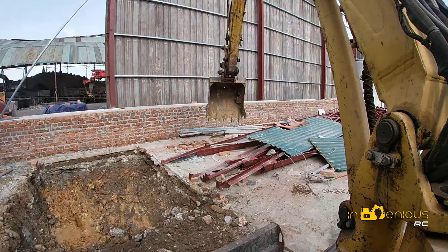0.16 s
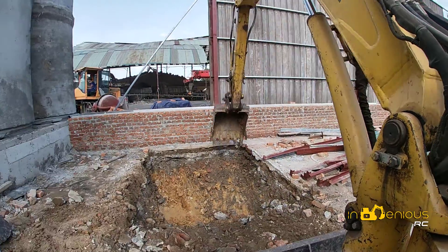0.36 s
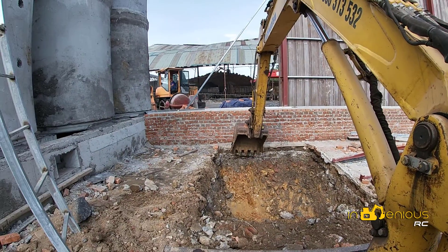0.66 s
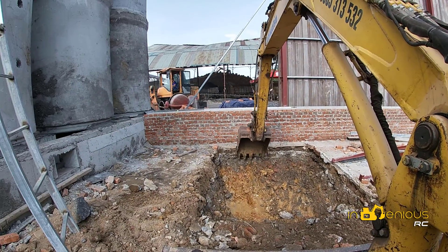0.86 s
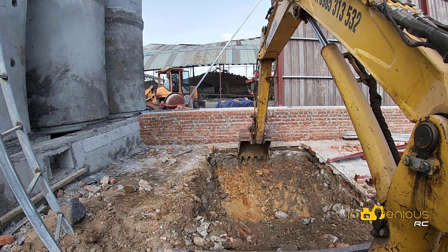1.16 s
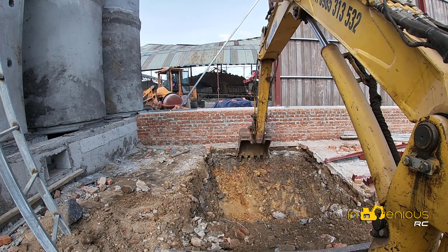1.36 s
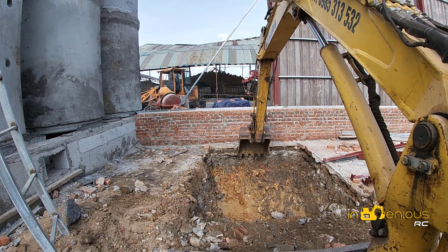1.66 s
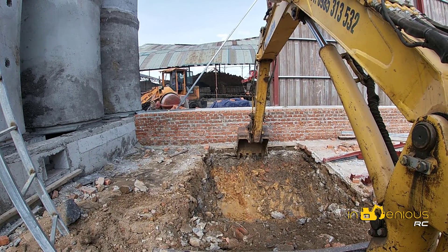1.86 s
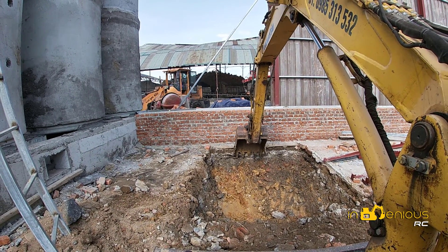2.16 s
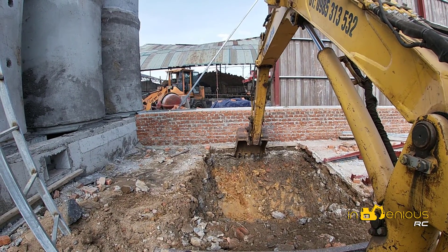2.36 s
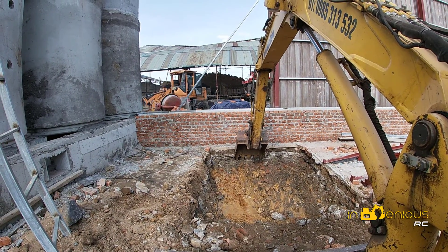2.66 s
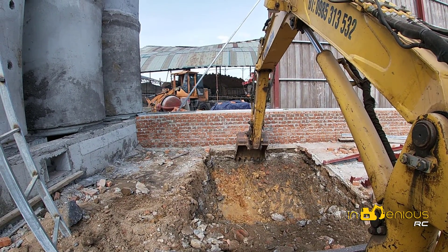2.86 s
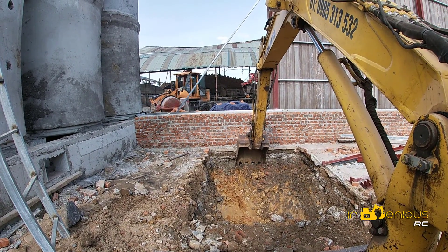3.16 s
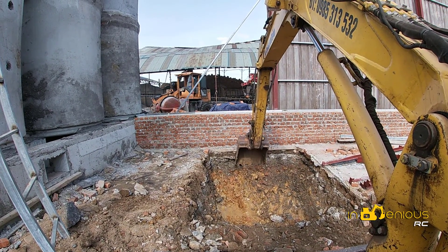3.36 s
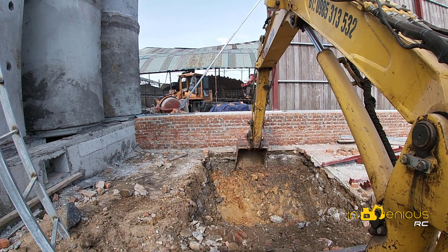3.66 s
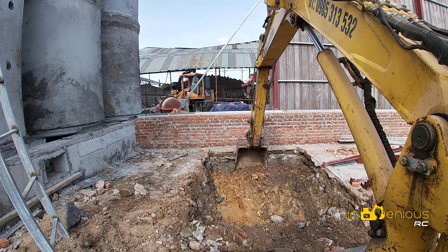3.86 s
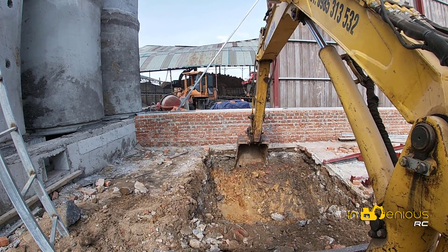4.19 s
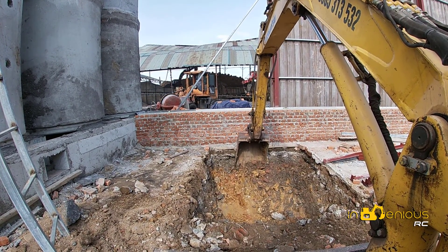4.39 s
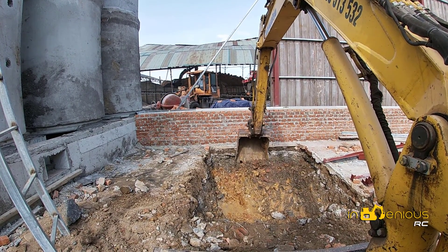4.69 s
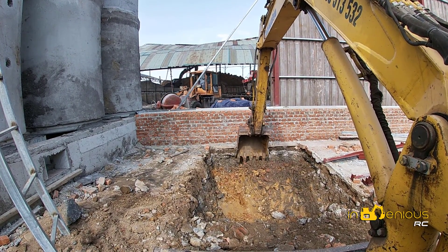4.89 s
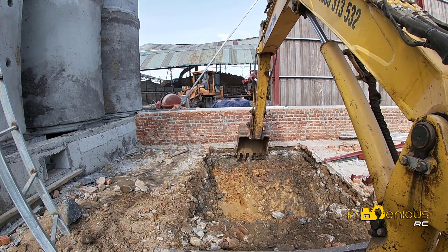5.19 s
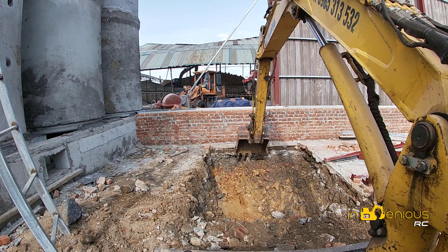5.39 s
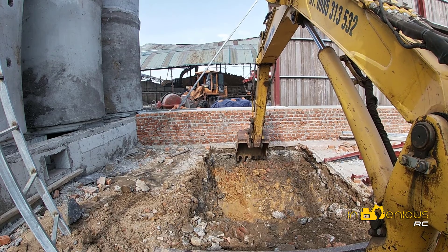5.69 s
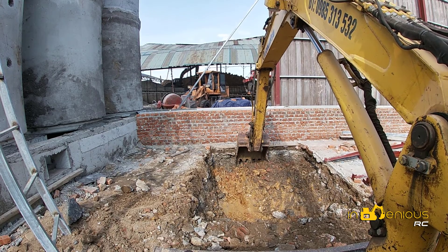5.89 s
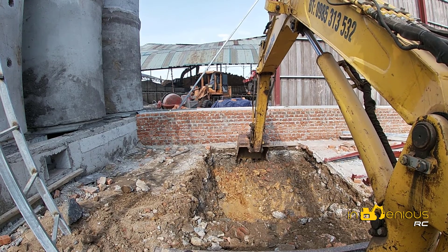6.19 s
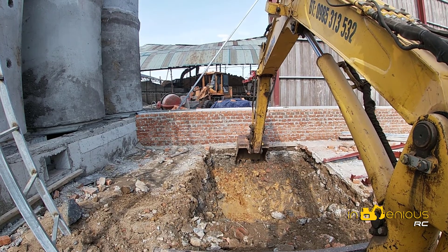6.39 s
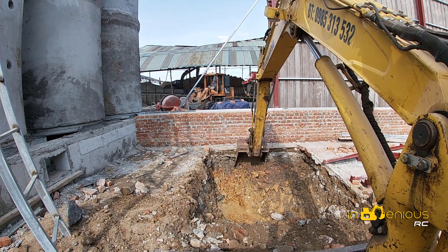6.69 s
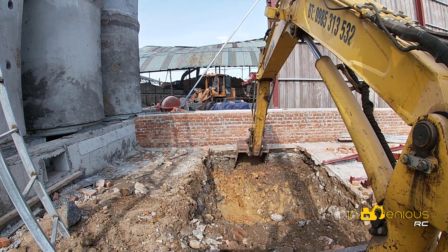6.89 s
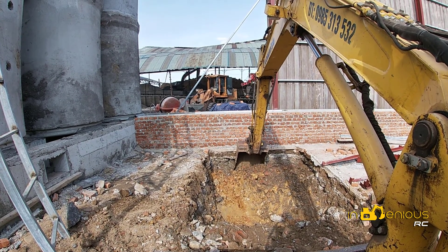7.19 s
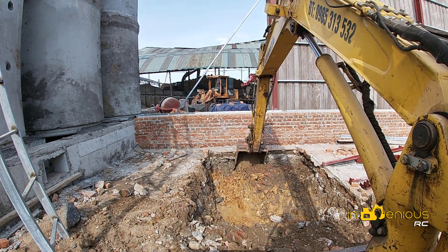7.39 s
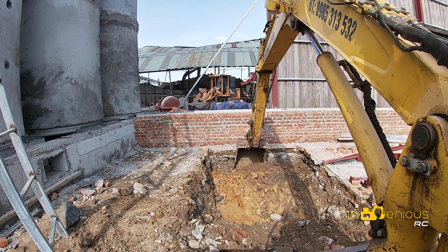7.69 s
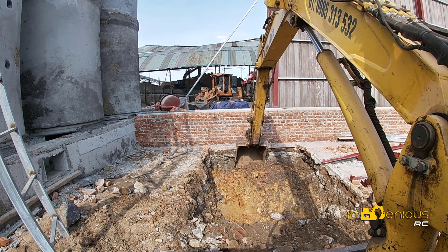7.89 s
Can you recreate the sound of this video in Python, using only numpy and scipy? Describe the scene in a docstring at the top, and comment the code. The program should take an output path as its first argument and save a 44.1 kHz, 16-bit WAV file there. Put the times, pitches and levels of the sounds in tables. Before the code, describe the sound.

A close, low diesel engine rattles and sags under load, with hydraulic hum and hiss alongside. After a brief lighter swing, the bucket knocks the ground and cracks several stones dryly. Grit then crunches in separate bursts with low metallic knocks and groans; steel squeals briefly on stone before a quieter scraping stretch and another crunch near the end. Microphone in the cab, outdoor yard with close walls.

```python
"""A walled yard with stony soil, heard from the driver's seat of a small digging excavator.
The diesel drones in firing orders and sags under hydraulic load; pump lines hum and whine along with it.
Shaped noise makes the block clatter, the panel rumble and the hiss of oil in the valves.
Bursts of grit are crunching rubble and snapping stones; the arm rings and knocks, sand trickles,
steel squeaks on stone, and the yard returns a short echo of the bucket sounds."""
import sys
import numpy as np
from scipy import signal
from scipy.fft import rfft, irfft
from scipy.io import wavfile
from scipy.ndimage import uniform_filter1d

SR = 44100
rng = np.random.default_rng(int(sys.argv[2]) if len(sys.argv) > 2 else 0)


def waveform_to_disk(signal):
    """Save audio, clipped to [-1, 1], as 16-bit WAV at the path in sys.argv[1]."""
    frames = np.transpose(np.atleast_2d(signal))
    scaled = np.clip(frames, -1, 1) * 32767
    samples = np.round(scaled).astype(np.int16)
    wavfile.write(sys.argv[1], SR, samples)


N = 355005
TIME = np.arange(N) / SR
NORMAL_HUM_DB = -24.5   # pump hum at ordinary working pressure

# spectrum of stone grit: (frequency [Hz], density [dB per Hz])
GRIT = [(400, -12), (900, 4), (1800, 5), (2600, 4.5), (3700, 4.5), (5000, -1), (6500, -8), (8000, -19.5),
        (10500, -23), (12000, -35.5), (14000, -46)]
# spectrum of bright oil spray and sand: (frequency [Hz], density [dB per Hz])
SPRAY = [(5500, 0.5), (7000, 0), (8300, -1.5), (10000, -1.5), (11500, -10.5), (14000, -20.5)]


def from_db(db):
    """Decibels to gain."""
    return 10 ** (np.asarray(db) / 20)


def rms_one(x):
    """Scale to unit power."""
    return x / np.sqrt(np.mean(x ** 2) + 1e-20)


def in_time(rows):
    """Each column of a curve, at every sample."""
    s, *columns = np.transpose(rows)
    return [np.interp(TIME, s, c) for c in columns]


def bumps(rows):
    """Gaussian swells or dips of level [dB]."""
    return sum(height_db * np.exp(-((TIME - s) / width_s) ** 2) for s, height_db, width_s in rows)


def drift(rate_hz):
    """Slow random signal of unit power, low-passed noise."""
    hz = np.fft.rfftfreq(N, 1 / SR)
    return rms_one(irfft(rfft(rng.standard_normal(N)) / (1 + (hz / rate_hz) ** 2), N))


def noise(spectrum, tilt_db=0, size=N):
    """Unit noise with the given spectrum, tilted per octave; 22 dB per octave slopes outside it."""
    octave = np.log2(np.fft.rfftfreq(size, 1 / SR) + 1)
    points, levels = np.transpose(spectrum)
    point_octave = np.log2(points)
    tilted_db = levels + tilt_db * np.log2(points / points[0])
    shape_db = np.interp(octave, point_octave, tilted_db)
    outside = np.abs(octave - np.clip(octave, point_octave[0], point_octave[-1]))
    return rms_one(irfft(rfft(rng.standard_normal(size)) * from_db(shape_db - 22 * outside), size))


def ring(force, hz, t60_s):
    """Two-pole resonator; a unit click starts a decaying sine of height 1."""
    r, w = from_db(-60 / (t60_s * SR)), 2 * np.pi * hz / SR
    return signal.lfilter([0, np.sin(w)], [1, -2 * r * np.cos(w), r * r], force + 1e-18)


def wavering_tone(hz, width_hz, size):
    """A unit sine whose phase wanders, which widens its line."""
    slip = np.cumsum(rng.standard_normal(size)) * np.sqrt(2 * np.pi * abs(width_hz) / SR)
    return np.sqrt(2) * np.sin(2 * np.pi * (hz * TIME[:size] + rng.random()) + slip)


def swell(rise_s, decay_from_s, t60_s, size):
    """Envelope that rises linearly and dies away exponentially from decay_from_s."""
    t = TIME[:size]
    return np.minimum(t / rise_s, 1) * np.exp(-np.log(1000) * np.maximum(t - decay_from_s, 0) / t60_s)


def add(track, s, sound):
    """Mix a sound in at time s."""
    at = int(s * SR)
    track[at:at + len(sound)] += sound[:N - at]


def load_of(firing_hz):
    """Load inferred from the speed sag: 0 running free, 1 labouring."""
    free_hz, labour_hz = 59.13, 51.73
    return np.clip((free_hz - firing_hz) / (free_hz - labour_hz), 0, 1)


def at_load(load, levels_db):
    """A level interpolated between its values at light, half and full load."""
    # load (0-1) that counts as (light, half, full)
    load_steps = (.22, 0.52, 0.95)
    return np.interp(load, load_steps, levels_db)


def partials(table, phase, load, flutter_db):
    """Fluttering lines locked to a shaft, their balance shifting with load."""
    out = np.zeros(N)
    for order, free_db, labour_db in table:
        level_db = free_db + load * (labour_db - free_db) + flutter_db * drift(12)
        out += from_db(level_db) * np.cos(order * phase + 2 * np.pi * rng.random())
    return np.sqrt(2) * out


def order_levels(load, slewing):
    """Load balances the main firing orders; dips act mostly on the upper ones."""
    # firing orders 1 to 4: (light load [dB], half load [dB], full load [dB],
    #                        share of the dips [ratio], change while only slewing [dB])
    orders = [(-31, -34, -38, -.3, -6.5), (-32.5, -29, -29.5, -0.07, -4.5), (-19, -21, -28.5, 0.9, -8),
              (-31.5, -29.5, -25.5, 0.92, -7.5)]
    # drone dips as the bucket breaks free: (time of the deepest [s], depth [dB], half width [s])
    dips = [(3.08, -10.5, 0.16), (4.22, -9, 0.14), (4.95, -8, 0.16), (6.93, -17, 0.11)]
    dip_db = bumps(dips)
    return [at_load(load, levels) + share * dip_db + slew_db * slewing
            for *levels, share, slew_db in orders]


def exhaust(crank, load, slewing, order_dbs, shake_db=1.48, smear_rad=0.23, flutter_db=3.0):
    """Firing orders, phase-smeared by the silencer; uneven cylinders add half orders."""
    # weaker orders: (multiple of the firing rate, running free [dB], labouring [dB])
    overtones = [(1.5, -55, -56.5), (3.5, -42.5, -38), (4.5, -53.5, -50), (5.5, -52.5, -49),
                 (6, -53.5, -35), (7, -49.5, -53.5), (8, -47, -58.5), (12, -56.5, -49.5)]
    main = np.zeros(N)
    for order, level_db in enumerate(order_dbs, 1):
        phase = order * crank - smear_rad * (order - 2) ** 2
        main -= from_db(level_db + shake_db * drift(30)) * np.cos(phase)
    slew_gain = from_db(-7.5 * slewing)
    return np.sqrt(2) * main + slew_gain * partials(overtones, crank, load, flutter_db)


def pump(crank, load, slewing, hum_db, shake_db=1.6, follow=0.35, flutter_db=2.5, lead_rad=3.24, slew_db=-5):
    """Pistons hum at twice the ripple rate, whine at other multiples; load shifts the hum's phase."""
    # weaker ripple lines: (multiple of the ripple rate, running free [dB], labouring [dB])
    weak_lines = [(1, -59.5, -34), (5, -57, -49), (7, -60.5, -52.5)]
    # whine: (multiple of the ripple rate, light load [dB], half load [dB], full load [dB],
    #         share of the surges [ratio])
    whine_lines = [(3, -37, -48, -38, -0.075), (4, -52.5, -52, -50.5, 1), (6, -50.5, -52, -41.5, 0.17)]
    # whine surges as the arm is worked: (time at the height [s], height [dB], half width [s])
    surges = [(2.5, 4.5, 0.83), (4.25, 6.5, 0.18), (5.2, 10.5, .22)]
    ripple = 5 / 2 * crank   # five ripples and two firings a turn
    hum = -from_db(hum_db + shake_db * drift(14)) * np.cos(2 * ripple + lead_rad * (1 - load))
    whine, surge_db = np.zeros(N), bumps(surges)
    for multiple, *levels, share in whine_lines:
        level_db = at_load(load, levels) + share * surge_db + slew_db * slewing + flutter_db * drift(5)
        whine += from_db(level_db) * np.cos(multiple * ripple + 2 * np.pi * rng.random())
    pressure_gain = from_db(follow * (hum_db - NORMAL_HUM_DB))
    lines = np.sqrt(2) * whine + partials(weak_lines, ripple, load, flutter_db)
    return np.sqrt(2) * hum + pressure_gain * lines


def noise_levels(load, slewing, hum_db):
    """Block clatter and oil hiss both grow with load, the hiss also with oil pressure."""
    hiss_per_pressure = 0.23   # dB of hiss per dB of pump hum
    clatter_db = -40.5 + 3 * load - 7.5 * slewing
    hiss_db = -53 + 3 * load + hiss_per_pressure * (hum_db - NORMAL_HUM_DB) - 3 * slewing
    return clatter_db, hiss_db


def valve_hiss(hiss_db, spray_db=-20, steepness=.7):
    """Faster oil cavitates, so a loud hiss is also a brighter one."""
    # oil hiss: (frequency [Hz], density [dB per Hz])
    hiss_spectrum = [(1500, -14.5), (2500, 1.5), (3400, 3), (4200, 0.5), (5200, -1.5), (6300, -10.5),
                     (7300, -20.5), (9000, -30)]
    bright_db = spray_db + steepness * (hiss_db - np.median(hiss_db))
    return noise(hiss_spectrum) + from_db(bright_db) * noise(SPRAY)


def machinery(crank, clatter_db, hiss_db, throb=0.1, limp=0.06, rattle_db=1.0,
              block_db=-3.5, repeat_db=-7, oil_db=-0.5, rumble_db=4, size=2048):
    """The block rattles with the firings, partly alike on every turn; panels rumble, oil hisses."""
    # block clatter: (frequency [Hz], density [dB per Hz])
    clatter_spectrum = [(300, -12), (450, 3.5), (600, 5.5), (850, 2), (1150, -4.5), (1650, -3), (2100, -14),
                        (2900, -11), (4000, -31), (7000, -48)]
    # panel rumble: (frequency [Hz], density [dB per Hz])
    rumble_spectrum = [(25, -33.5), (45, -7), (80, -9), (130, -12.5), (190, -2), (270, -8), (360, -9),
                       (480, -21.5), (700, -26)]
    pulse = 1 + throb * np.cos(crank) + limp * np.cos(crank / 2)
    beat = rms_one(pulse * from_db(rattle_db * drift(57)))
    turns = crank / (4 * np.pi)   # two firings a turn
    one_turn = noise(clatter_spectrum, tilt_db=1.0, size=size)
    repeating = np.interp(turns * size, np.arange(size), one_turn, period=size)
    block = beat * (from_db(block_db) * noise(clatter_spectrum) + from_db(repeat_db) * repeating)
    panels = from_db(rumble_db) * noise(rumble_spectrum)
    oil = from_db(hiss_db + oil_db) * np.sqrt(np.abs(beat)) * valve_hiss(hiss_db)
    return from_db(clatter_db) * (block + panels) + oil


def crunches(grain_db=3, tail_t60_s=0.12, crunch_db=0.5, stones_db=-9, stone_hz=3200, size=SR // 2):
    """Rubble gives way in a burst of tiny fractures, and a few loose stones ring with it."""
    # collapses: (time [s], relative level [dB], start of decay [s after onset], tilt [dB per octave])
    collapses = [(0.44, -53.5, 0.054, -10), (0.695, -49, 0.014, 1), (0.736, -50, .1, 1.5),
                 (2.332, -41.5, 0.022, -3.5), (2.495, -45.5, 0.035, -0.5), (2.664, -36.5, 0.017, 2),
                 (2.722, -45, 0.018, 2), (2.876, -36, 0.012, -4.5), (2.919, -34, 0.019, -14),
                 (3.256, -38.5, .012, -15.5), (3.321, -43, 0.027, -5), (3.764, -37, 0.0074, 0.5),
                 (3.797, -47, 0.017, 3), (4.029, -47.5, 0.098, -0.5), (4.196, -37, 0.029, -7),
                 (4.252, -51, 0.03, 6.5), (4.77, -39.5, 0.027, -5.5), (4.891, -35.5, 0.011, 5.5),
                 (4.905, -34, 0.018, -5.5), (6.459, -52, 0.013, 7), (6.563, -37.5, 0.013, .5),
                 (6.77, -44, .035, -1.5), (6.805, -34.5, 0.013, -7)]
    stone_t60_s = .006   # loose stones barely ring
    out = np.zeros(N)
    for s, level_db, length_s, bright_db in collapses:
        smooth = uniform_filter1d(uniform_filter1d(rng.standard_normal(size), size=70), size=16)
        fractures = rms_one(from_db(grain_db * rms_one(smooth)))
        grit = noise(GRIT, bright_db, size) * fractures
        pitches_hz = stone_hz * 2 ** rng.uniform(-0.58, 0.68, size=6)
        stones = rms_one(sum(ring(grit, hz, stone_t60_s) for hz in pitches_hz))
        burst = (grit + from_db(stones_db) * stones) * swell(0.002, length_s, tail_t60_s, size)
        add(out, s, from_db(level_db + crunch_db) * burst)
    return out


def snaps(ring_db=-9, crack_db=-8, dust_db=-13, size=SR // 5):
    """A stone cracks dryly, the bucket teeth ring briefly and chips spray."""
    # blows: (time [s], relative level [dB])
    blows = [(0.479, -38.5), (0.5721, -44.5), (0.9557, -39.5), (1.228, -35), (1.2367, -29), (1.2807, -28),
             (1.4706, -27), (1.5368, -29.5), (1.615, -33.5), (1.6467, -32.5), (2.614, -41), (5.497, -36)]
    # ring of the teeth: (frequency [Hz], relative level [dB], t60 [s])
    teeth_modes = [(3750, -16, .025), (4950, -1, .035), (5300, -12, .02), (6100, -9, .014), (6750, -4, .01),
                   (7500, -6, .008), (9700, -15, .01), (10800, -18, .015)]
    # splitting stone: (frequency [Hz], density [dB per Hz])
    crack_spectrum = [(2500, -13), (4300, -6), (4950, 10.5), (7000, 0.5), (9000, -18.5), (11000, -25),
                      (13500, -30)]
    out = np.zeros(N)
    split, spray = swell(.0004, .0012, .012, size), swell(.002, .003, .08, size)
    for s, level_db in blows:
        click, teeth = signal.unit_impulse(size), np.zeros(size)
        for hz, db, t60_s in teeth_modes:
            mode = ring(click, hz * rng.normal(1, 0.0075), t60_s)
            teeth += mode * from_db(db + rng.normal(0, 2.7)) * rng.choice([-1, 1])
        crack = noise(crack_spectrum, size=size) * split
        chips = noise(GRIT, tilt_db=2, size=size) * spray
        snap = from_db(ring_db) * teeth + from_db(crack_db) * crack + from_db(dust_db) * chips
        add(out, s, from_db(level_db) * snap)
    return out


def boom(load):
    """Noise, as from uneven firings, rings the hollow arm's lowest mode through two equal resonators."""
    boom_hz, width_hz, boom_db = 172.4, 9.2, -33
    r = np.exp(-np.pi * width_hz / SR)
    poles = [1, -2 * r * np.cos(2 * np.pi * boom_hz / SR), r * r]
    once = signal.lfilter([1, 0, -1], poles, rng.standard_normal(N))
    return from_db(boom_db) * load * rms_one(signal.lfilter([1, 0, -1], poles, once))


def knocks(arm_db=-2.5, shell_db=-4, shell_t60_s=0.15, push_s=0.0045, soft_hz=2500, size=SR // 2):
    """A jolt rings the hollow arm and the bucket shell groans on the ground; soil dulls both."""
    # jolts: (time [s], relative arm level [dB], relative shell level [dB], shell pitch [Hz])
    jolts = [(.692, -15.5, -40.5, 650), (0.764, -21.5, -37, 700), (2.881, -15, -33, 802),
             (2.918, -14.5, -38, 650), (4.037, -18, -30, 852), (4.062, -17, -29, 790),
             (4.093, -15, -25.5, 880), (4.12, -25, -30, 834), (4.785, -30, -34, 1050),
             (4.815, -16, -43, 600), (4.903, -17.5, -28, 655), (4.925, -20, -22.5, 562),
             (6.567, -27, -39, 924), (6.778, -12.5, -46, 740), (6.803, -14.5, -44, 726),
             (7.645, -20, -30.5, 883), (7.734, -20.5, -33, 838)]
    # arm modes: (frequency [Hz], relative level [dB], t60 [s])
    arm_modes = [(166.3, -5.5, 0.71), (199, 7.5, 0.061), (233, -2.5, 0.011), (365.6, -10, 0.27)]
    out = np.zeros(N)
    push = np.minimum(TIME[:size] / push_s, 1)
    for s, jolt_db, groan_db, hz in jolts:
        click, arm = signal.unit_impulse(size), np.zeros(size)
        for mode_hz, db, t60_s in arm_modes:
            arm += ring(click, mode_hz * rng.normal(1, 0.027), t60_s) * from_db(db)
        shell_spectrum = [(hz / 1.5, -16), (hz / 1.1, -6), (hz, 0), (hz * 1.1, -6), (hz * 1.6, -16)]
        shell = noise(shell_spectrum, size=size) + wavering_tone(hz, 25, size)
        groan = shell * swell(0.0068, 0.0075, shell_t60_s, size)
        add(out, s, from_db(jolt_db + arm_db) * arm * push + from_db(groan_db + shell_db) * groan)
    return signal.sosfilt(signal.butter(2, soft_hz, fs=SR, output="sos"), out + 1e-18)


def crumbs(per_s=45, crumb_db=-55, spread_db=0.5, t60_s=0.018, sand_db=-74.0, size=SR // 10):
    """While the bucket drags through the soil, sand trickles and small stones tumble at random."""
    # drag through the soil: (time [s], strength [0-1])
    drag = [(2.2, 0), (2.5, 1), (4.2, 1), (4.5, 0.54), (5.5, 0.8), (6.8, 0.8), (7.1, 0.3)]
    dragging = np.clip(in_time(drag)[0], 0, None)
    fall_gain = from_db(spread_db * np.minimum(rng.exponential(1, N), 3))
    falls = (rng.random(N) < per_s * dragging / SR) * fall_gain
    tumble = signal.fftconvolve(falls, swell(0.0014, 0.00087, t60_s, size))[:N]
    stones = from_db(crumb_db) * tumble * noise(GRIT, tilt_db=6.5)
    return stones + from_db(sand_db) * np.sqrt(dragging) * noise(SPRAY)


def squeaks(size=SR // 4):
    """Steel skids on stone: stick and slip drives close modes, which beat against each other."""
    # skids: (time [s], relative level [dB], pitch ratio, rise [s], t60 [s])
    skids = [(4.784, -48, 1.385, 0.011, 0.05), (4.814, -23.5, 1, 0.0085, 0.071),
             (4.901, -33, 0.99, 0.011, 0.038), (4.912, -35, 1.24, 0.0035, 0.019),
             (6.77, -46.5, 1.45, 0.0059, .08), (6.787, -39, 0.74, 0.01, 0.086)]
    # steel modes: (frequency at pitch ratio 1 [Hz], relative level [dB], line width [Hz])
    steel_modes = [(3120, -13.5, 110), (3430, -1, 20), (3434, -7, 30), (3630, -5, 40), (4070, -9.5, 60),
                   (6280, -20, 26), (6760, -19, 140), (7500, -33, 250), (10500, -37, 300)]
    out = np.zeros(N)
    for s, level_db, ratio, rise_s, t60_s in skids:
        squeal = sum(from_db(db) * wavering_tone(hz * ratio, width_hz, size)
                     for hz, db, width_hz in steel_modes)
        add(out, s, from_db(level_db) * squeal * swell(rise_s, rise_s, t60_s, size))
    return out


def yard(x, wet_db=-14, t60_s=0.1, size=SR // 2):
    """The walls return a short, scattered echo: convolution with decaying noise."""
    echo = rng.standard_normal(size) * swell(0.016, 0.015, t60_s, size)
    return x + from_db(wet_db) * signal.fftconvolve(x, echo / np.linalg.norm(echo))[:N]


def scene(wobble_rad=0.029, uneven_db=.5, hum_trim_db=-0.27):
    """Engine, pump and oil without echo, no two firings quite alike; bucket sounds echo in the yard."""
    # engine speed, sagging as the hydraulics take load: (time [s], firing rate [Hz])
    speed = [(0.0, 57.7), (0.16, 57.9), (0.3, 54.2), (0.5, 54.2), (0.8, 52.7), (1.0, 55.8), (1.45, 57.55),
             (1.8, 57.45), (2.42, 55.85), (2.6, 54.1), (2.82, 56.4), (3.1, 53.35), (3.9, 53.0),
             (4.62, 54.9), (4.83, 52.3), (5.0, 53.5), (5.4, 53.7), (5.75, 55.9), (6.02, 57.2), (6.3, 55.5),
             (6.52, 53.4), (6.75, 54.7), (7.0, 52.9), (7.5, 53.1), (8.05, 54.1)]
    # oil pressure, expressed as pump hum: (time [s], level before trim [dB])
    pressure = [(0.0, -31.5), (0.18, -47), (0.38, -37), (0.54, -39.5), (0.9, -22.5), (1.52, -25),
                (2.73, -25.5), (2.87, -32.5), (3.65, -23), (4.57, -38), (4.95, -27.5), (5.25, -30),
                (5.54, -20.5), (6.05, -25.5), (6.57, -24), (7.04, -30.5), (7.6, -24.5), (8.05, -27.5)]
    valve_s, opening_s = .692, .004   # until the valve opens, the cab only slews
    firing_hz, = in_time(speed)
    hum_db, = in_time(pressure)
    load = load_of(firing_hz)
    slewing = np.clip(1 - (TIME - valve_s) / opening_s, 0, 1)
    # one cycle of phase per firing
    crank = 2 * np.pi * np.cumsum(firing_hz) / SR + wobble_rad * drift(26)
    drone = exhaust(crank, load, slewing, order_levels(load, slewing)) * from_db(uneven_db * drift(45))
    pumping = pump(crank, load, slewing, hum_db + hum_trim_db)
    rattle = machinery(crank, *noise_levels(load, slewing, hum_db))
    machine = drone + pumping + rattle + boom(load * (1 - slewing))
    digging = crunches() + snaps() + knocks() + crumbs() + squeaks()
    return (machine + yard(digging))[None]


def record(dry):
    """Fade both ends over 4 ms; low-pass steeply, 70 dB down from 14.4 kHz up."""
    fade = np.clip(np.minimum(TIME, TIME[-1] - TIME) / .004, 0, 1)
    return signal.sosfilt(signal.cheby2(14, 70, 14400, fs=SR, output="sos"), dry * fade)


dry = scene()
out = record(dry)
waveform_to_disk(out)
```